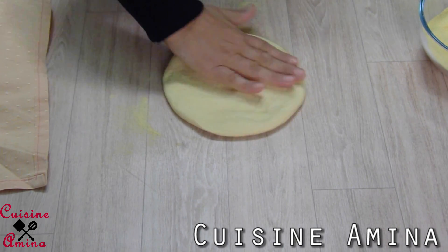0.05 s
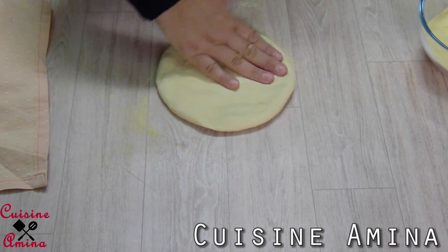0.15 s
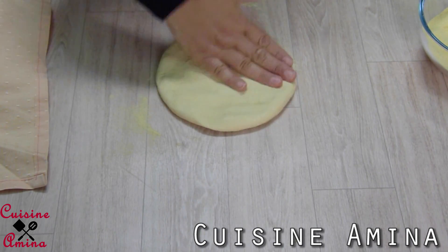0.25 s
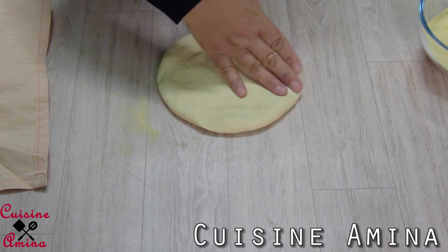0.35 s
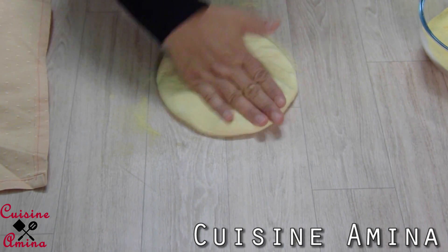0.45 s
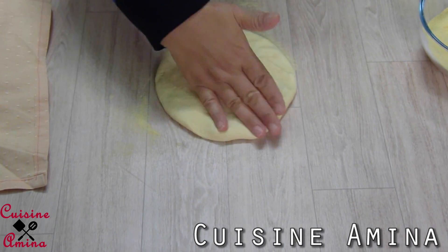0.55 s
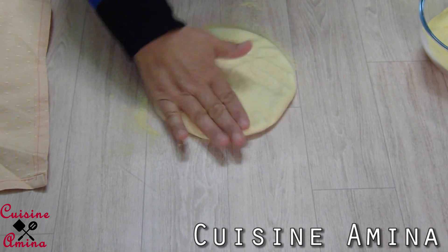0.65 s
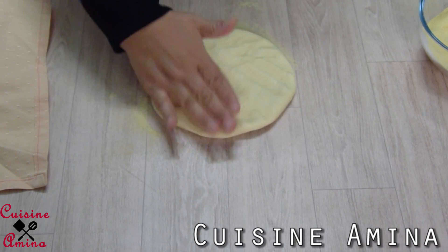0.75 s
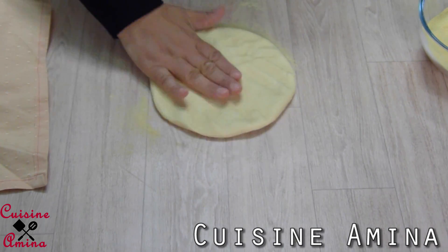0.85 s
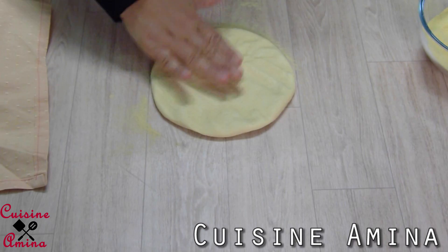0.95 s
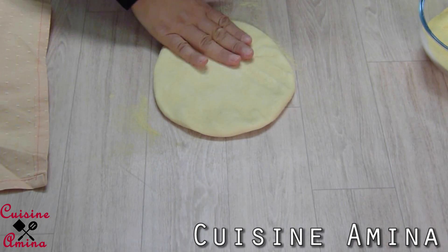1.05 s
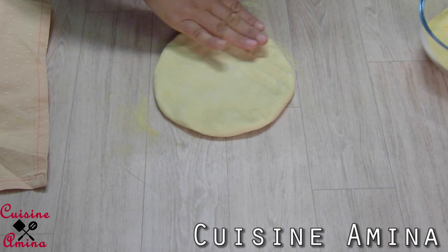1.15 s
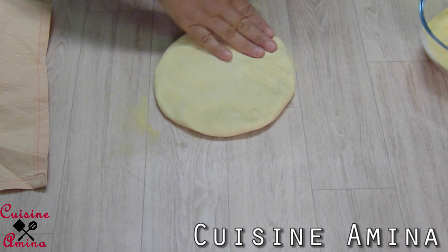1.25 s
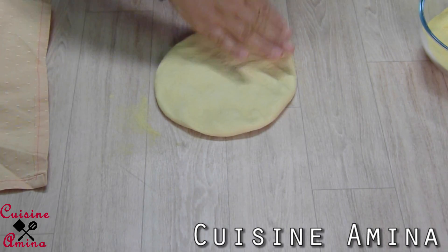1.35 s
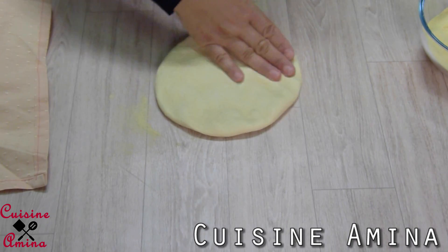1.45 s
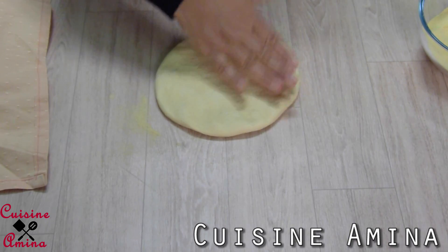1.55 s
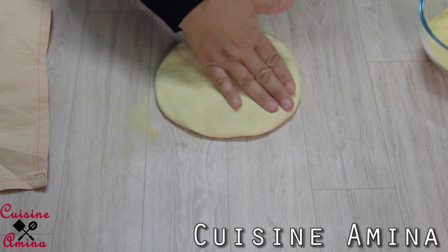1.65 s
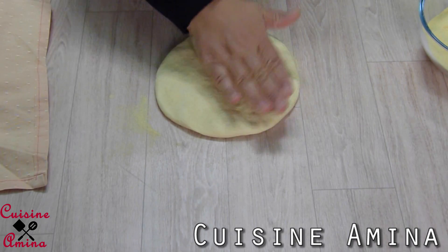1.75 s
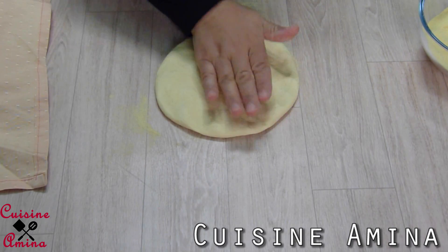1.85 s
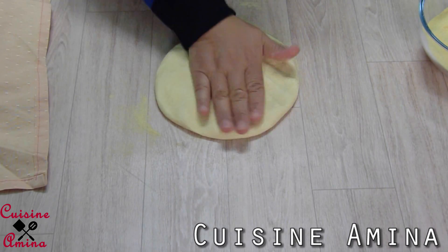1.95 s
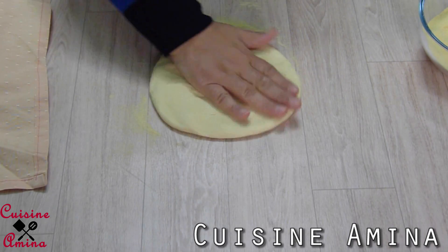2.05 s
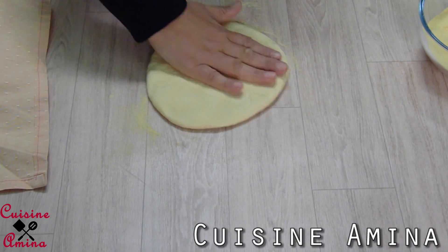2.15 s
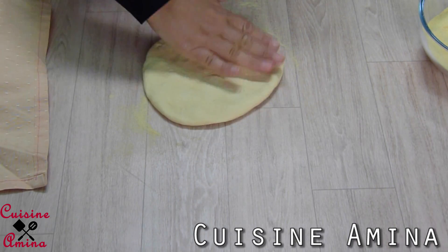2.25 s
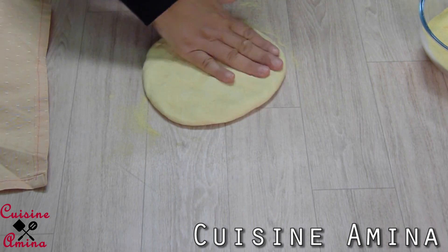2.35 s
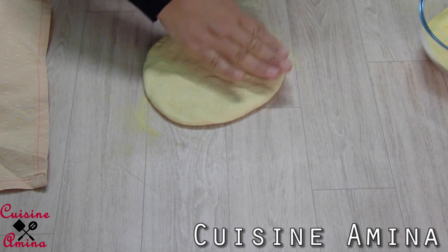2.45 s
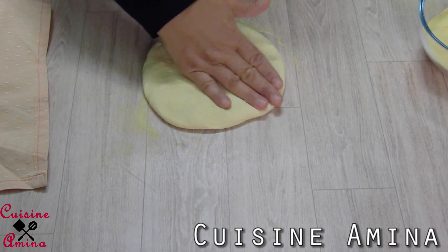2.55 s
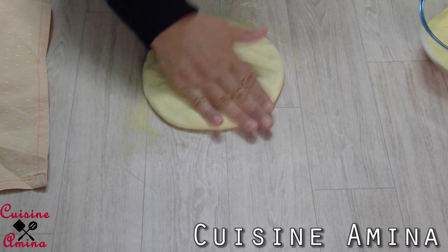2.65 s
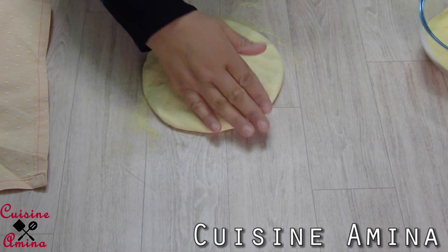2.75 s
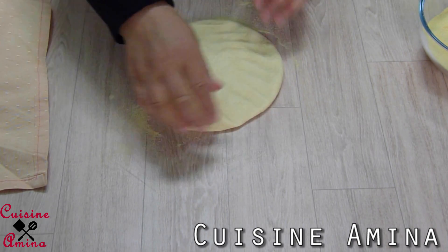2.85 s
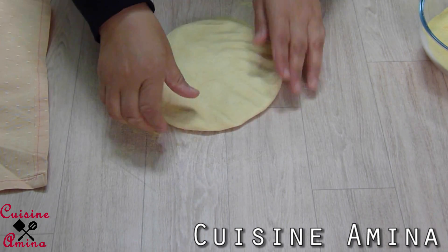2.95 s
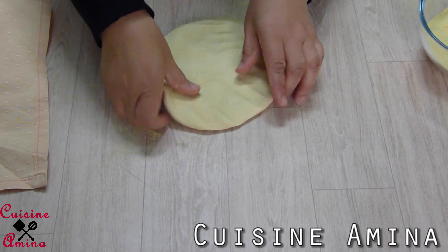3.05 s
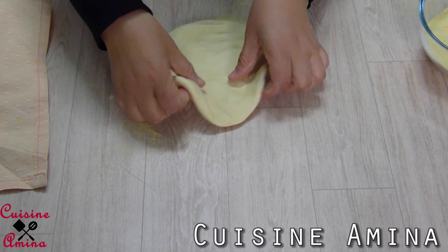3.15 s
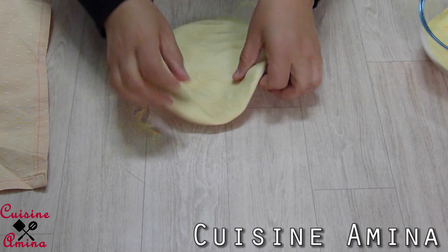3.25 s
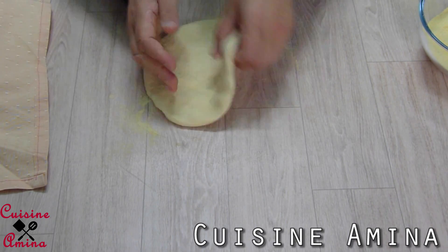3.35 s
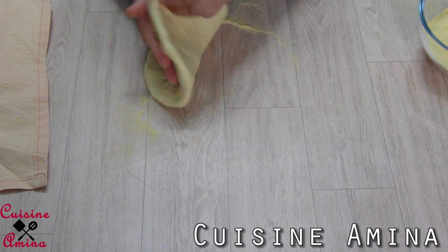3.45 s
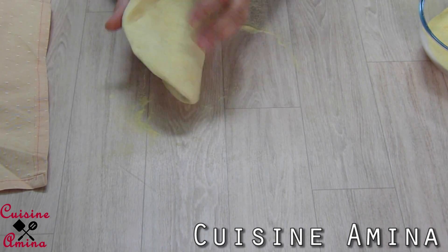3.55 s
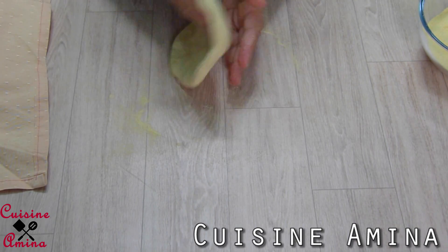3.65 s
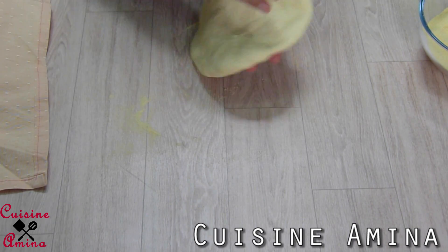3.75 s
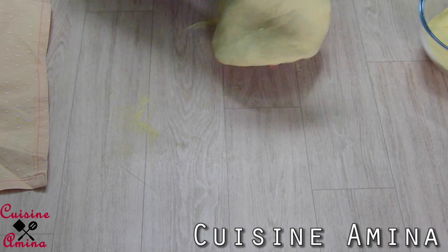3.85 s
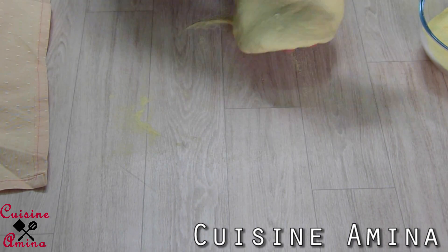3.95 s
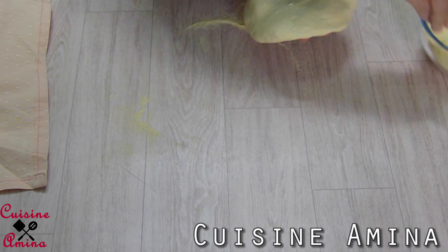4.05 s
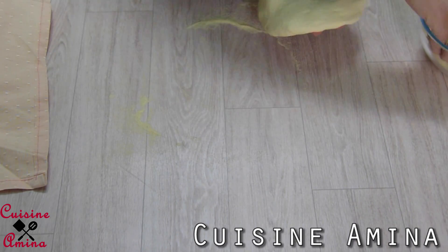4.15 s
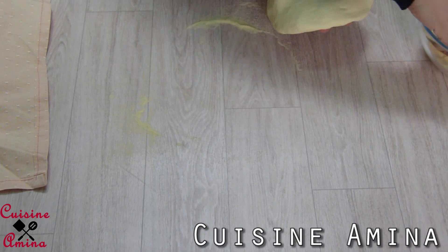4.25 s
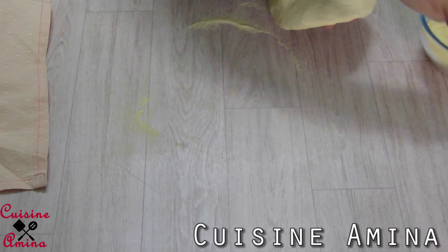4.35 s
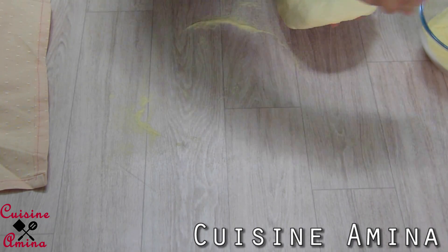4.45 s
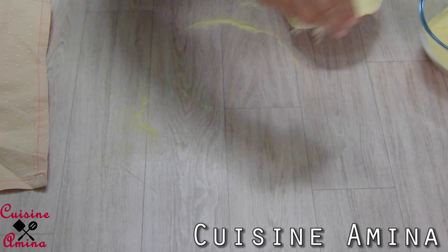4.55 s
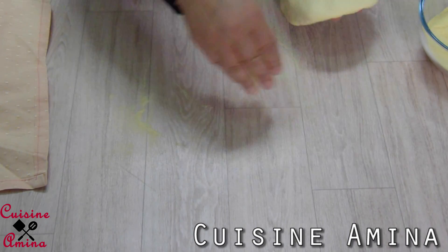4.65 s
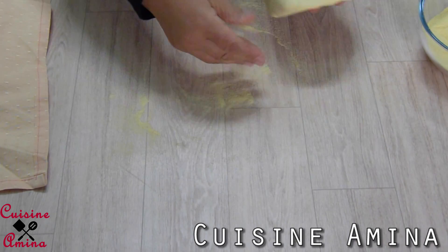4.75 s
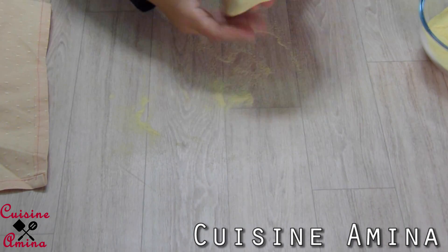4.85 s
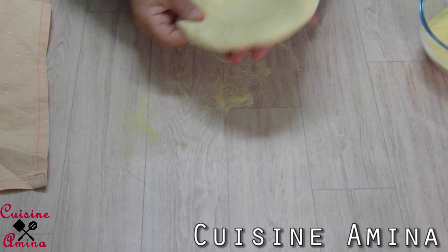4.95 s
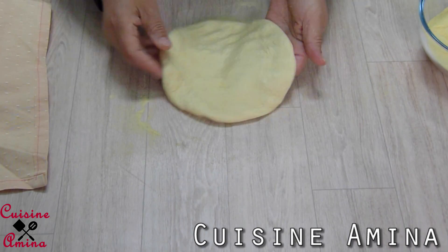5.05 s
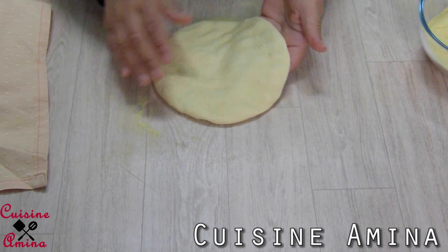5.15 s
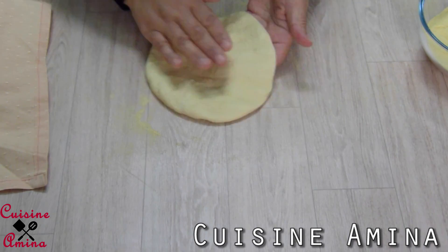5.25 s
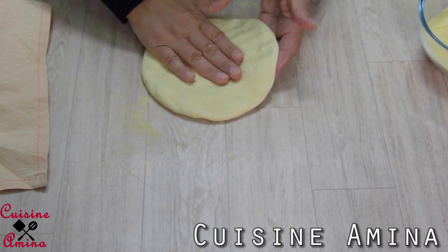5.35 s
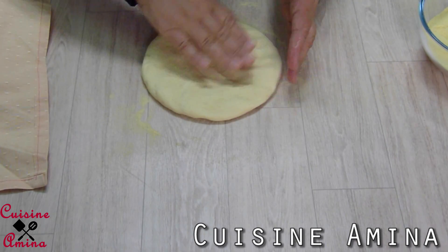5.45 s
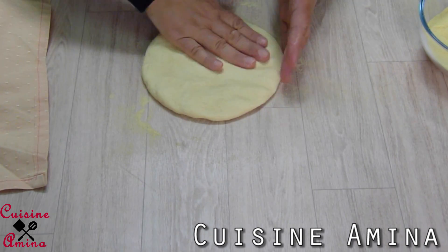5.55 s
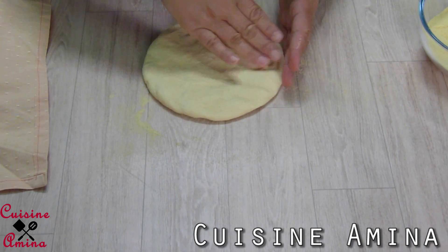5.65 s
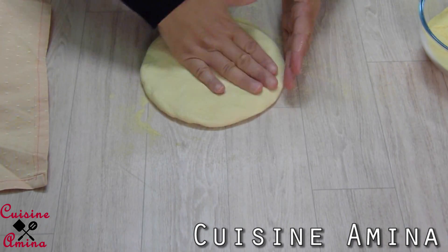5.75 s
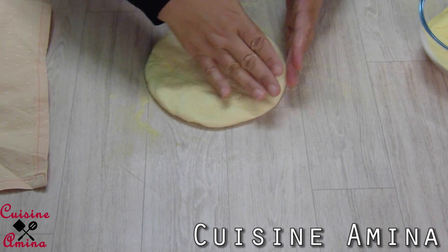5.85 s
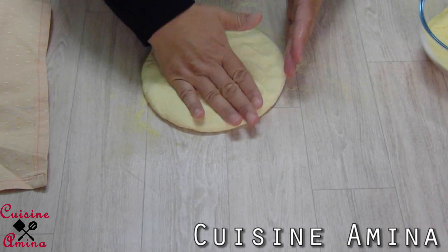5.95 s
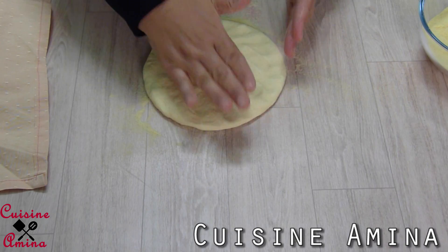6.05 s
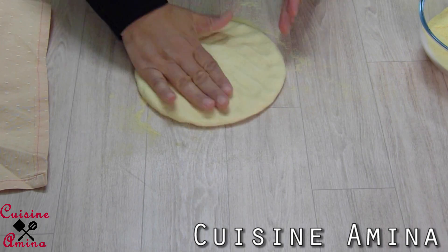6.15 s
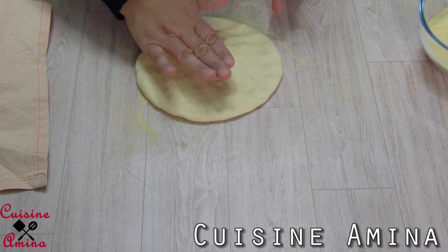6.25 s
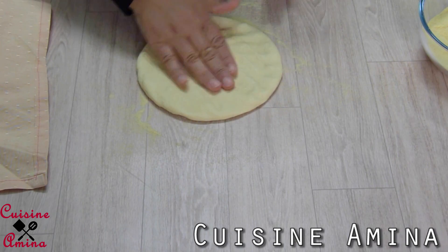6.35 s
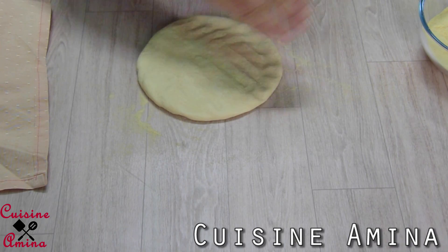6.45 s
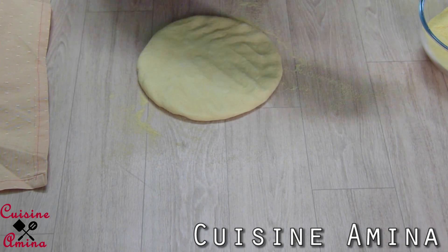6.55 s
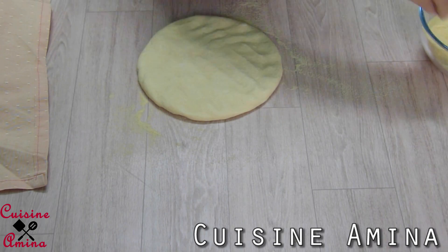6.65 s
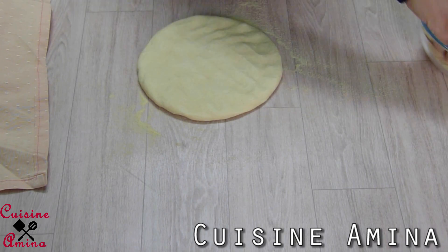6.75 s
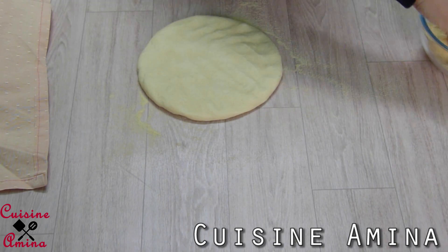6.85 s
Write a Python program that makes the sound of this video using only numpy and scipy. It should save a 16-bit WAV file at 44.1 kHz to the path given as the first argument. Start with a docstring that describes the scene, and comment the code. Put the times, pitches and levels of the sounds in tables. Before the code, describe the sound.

A hand pats soft dough flat on a floured table, about five times a second. Light pats grow into hard slaps that make the tabletop boom, then ease off. The dough is turned over with small ticks and a gritty slide, and a glass bowl rings faintly once. The patting resumes, with two hard slaps near the end. Heard up close in a small, slightly echoing kitchen with a steady low rush.

```python
"""Over the steady low rush of a small, hard-walled kitchen, a hand pats soft dough flat on a floured table.
Light pats grow into hard ones: each push drives the table top into a low boom as air claps under the palm.
The patting eases and the dough is turned over, ticking and sliding on gritty flour; at about 4 s a
glass bowl is touched once and rings. The pats resume, two hard ones come just after 6 s, and they die away.
Throughout, the walls answer with a short reverberation."""
import sys
import numpy as np
from scipy import signal
from scipy.fft import rfft, irfft, next_fast_len
from scipy.io import wavfile

SR = 44100
rng = np.random.default_rng(int(sys.argv[2]) if len(sys.argv) > 2 else 0)


def wav_record(signal):
    """Record a signal, one row per channel, as 16-bit PCM in the file named by sys.argv[1]."""
    frames = np.transpose(np.atleast_2d(signal))
    bounded = np.clip(frames, -1, 1)
    # unit amplitude maps onto the largest positive 16-bit level
    quanta = np.round(bounded * 32767).astype(np.int16)
    wavfile.write(sys.argv[1], SR, quanta)


N = 304731

# pats of the hand: start_s, thump_db, contact_ms, knock_db, knock_hz, slap_db
PATS = [(0.002, 1.5, 0.56, -16.5, 525, -17), (0.136, 0, 1, -22, 520, -27), (0.318, 0.5, 1, -20, 510, -25),
        (0.5208, 2, 0.61, -13, 584, -19), (0.722, 30.5, 3.8, -11, 540, -13),
        (0.913, 20.5, 0.25, 3, 595, -3), (1.079, 20.5, 0.37, -7.5, 382, -1.1),
        (1.2505, 21, 2, -15.5, 520, -14.5), (1.452, 16, 1.22, -11, 566, -13),
        (1.6485, 21, 1.58, -11.5, 540, -13.5), (1.86, 7.5, 1.35, -22, 530, -20),
        (2.001, -0.5, 1.2, -18.5, 537, -21), (2.0151, 8.5, 0.35, -25, 380, -37),
        (2.3705, 14.5, 0.42, -5, 400, -4.5), (2.56, 14.5, 0.81, -12, 563, -13.5),
        (2.7338, 20, 3.6, -22, 520, -24), (2.791, -4, 0.18, -16, 610, -20.5),
        (3.0634, 7.5, 1.9, -18, 534, -34), (3.195, 1.5, 0.27, -10, 494, -28),
        (3.322, -5.5, 0.17, -19, 510, -15), (4.1289, 6, 1.03, -28, 520, -29.5),
        (4.8751, -8, 0.16, -25, 517, -23.5), (5.079, -1, 0.28, -21, 520, -16),
        (5.1074, 5, 0.16, -8.5, 554, -7), (5.1284, 9, 0.28, -23, 520, -6), (5.398, 5.5, 1.7, -17, 534, -15),
        (5.545, -0.5, 0.13, -11, 870, -40), (5.585, 9.5, 0.35, -4, 585, -6.5),
        (5.7864, 4.5, 0.5, -15, 700, -19), (5.992, -4, 0.36, -20.5, 535, -18.5),
        (6.2085, 21, 0.5, -2, 720, -3.5), (6.369, 21.5, 0.55, -6.5, 710, -1),
        (6.5294, -1.5, 1.1, -40, 520, -41), (6.897, -14, 0.55, -17, 525, -28)]


def amp(db):
    """Decibels to amplitude ratio."""
    return 10 ** (np.asarray(db) / 20)


def unit(x):
    """Normalisation to rms 1."""
    return x / np.sqrt(np.mean(x ** 2) + 1e-20)


def along(points, hz):
    """Interpolation of (frequency, value) points on a logarithmic frequency axis."""
    f, v = np.transpose(points)
    return np.interp(np.log(hz + 1), np.log(f + 1), v)


def filtered(x, response):
    """Linear filtering: the spectrum of x times a frequency response."""
    n = x.shape[-1]
    m = next_fast_len(n + min(n, SR))
    return irfft(rfft(x, m) * response(np.fft.rfftfreq(m, 1 / SR)), m)[..., :n]


def resonance(f, hz, width):
    """Frequency response of a damped harmonic oscillator."""
    return 1j * f * width / (hz * hz - f * f + 1j * f * width)


def plate(f, modes):
    """Modal superposition in a plate, whose neighbouring modes swing in opposite directions."""
    return sum((-1) ** k * amp(db) * resonance(f, hz, width) for k, (hz, width, db) in enumerate(modes))


def add(track, s, sound):
    """Superposition of a sound on a track at s seconds."""
    i = max(round(s * SR), 0)
    part = track[..., i:i + sound.shape[-1]]
    part += sound[..., :part.shape[-1]]


def burst(t60, response):
    """Transient excitation: decaying noise through a frequency response, scaled to energy 1."""
    t = np.arange(SR // 16) / SR
    spectrum = rfft(rng.standard_normal(len(t)) * amp(-60 * t / t60), 2 * len(t))
    spectrum = spectrum / np.abs(spectrum) ** .85  # partly evens out random peaks
    puff = irfft(spectrum * response(np.fft.rfftfreq(2 * len(t), 1 / SR)))[:len(t)]
    return puff / np.linalg.norm(puff)


def spread(pair, width):
    """Spatial coherence: mid and side become left and right, alike in the bass at close microphones."""
    # frequency_hz, side_gain
    apart = [(100, .02), (250, 0.04), (500, 0.2), (1000, 0.44), (2000, 0.97), (5000, 1.0), (9000, 0.61)]
    side = filtered(pair[1], lambda f: width * along(apart, f))
    return np.array([pair[0] + side, pair[0] - side])


def room_rush(level_db=-50.5):
    """Stationary noise: the room's steady background, strongest in the bass."""
    # spectrum of the rush: frequency_hz, level_db
    spectrum = [(20, -38), (32, -27), (48, 0), (85, -10.5), (135, 1), (220, -1), (360, 0.5), (550, -7),
                (800, -9.5), (1200, -10), (2000, -18), (4000, -23), (7000, -27), (11000, -37.5)]
    pair = filtered(rng.standard_normal((2, N)), lambda f: amp(along(spectrum, f)))
    return amp(level_db) * spread(unit(pair), width=1.0)


def kitchen_reverb(x, delay_s=.007, block=13230):
    """Reverberation: diffuse reflections follow a short gap, their pattern varying as the hands move."""
    # reverberation time of the kitchen: frequency_hz, t60_s
    decay = [(100, 1), (250, 0.66), (700, 0.53), (2500, 0.47), (6000, 0.47), (10000, 0.39)]
    out = np.zeros((2, N))
    for i in range(0, N, block):  # a fresh random tail for each block
        hz, t, noise = signal.stft(rng.standard_normal((2, SR // 2)), SR, nperseg=256)
        fade = amp(-60 * t / along(decay, hz)[:, None])
        tail = signal.istft(noise * fade, SR, nperseg=256)[1]
        tail /= np.linalg.norm(tail[0])
        add(out, i / SR + delay_s, signal.fftconvolve(x[None, i:i + block], tail, axes=1))
    return spread(out, width=0.68)


def glass_bowl(start_s=4.128, attack_s=0.0022):
    """Free vibration: brushed by a passing hand, the bowl rings in exponentially decaying modes."""
    # modes of the glass: pitch_hz, level_db, t60_s
    modes = [(940, -75, 2.5), (1160, -59.5, 2.8), (4160, -52, 0.33), (6370, -60, 0.32), (9615, -66, .28)]
    out, t = np.zeros(N), np.arange(2 * SR) / SR
    ring = sum(amp(db - 60 * t / t60) * np.sin(2 * np.pi * hz * t) for hz, db, t60 in modes)
    add(out, start_s, ring * (1 - np.exp(-t / attack_s)))
    return out


def skin_squeaks():
    """Friction: skin drags briefly on dough, giving narrow-band noise around one pitch."""
    # squeaks: start_s, level_db, pitch_hz, length_s
    squeaks = [(2.131, -51, 1280, 0.039), (3.208, -45.5, 1190, 0.034), (5.157, -40.5, 2380, 0.041)]
    out = np.zeros(N)
    for s, db, hz, length in squeaks:
        swell = np.hanning(int(length * SR))
        rub = filtered(rng.standard_normal(len(swell)), lambda f: resonance(f, hz, hz / 5) ** 2)
        add(out, s, amp(db) * swell * unit(rub))
    return out


def finger_ticks(t60=0.0081, level_db=-1, widen=1.74):
    """Impulsive excitation: fingertips tap and sticky dough lets go, each tick in its own band."""
    # ticks: start_s, relative_db, centre_hz, base_width_hz
    ticks = [(1.2482, -21, 4500, 1800), (2.6632, -16, 2400, 1000), (2.667, -13.5, 645, 300),
             (2.789, -18, 2010, 900), (3.0442, -18, 4120, 3000), (3.1092, -17, 3120, 1100),
             (3.1354, -21, 5500, 2000), (3.1936, -19, 3000, 1700), (3.3206, -14, 2630, 1100),
             (3.7723, -11, 1030, 320), (3.776, -27, 2600, 1200), (4.3447, -27.5, 3830, 1000),
             (4.4054, -33, 3840, 1000), (4.7627, -30, 4000, 2500), (4.8735, -21.5, 2620, 2200),
             (5.5415, -18.5, 1100, 950), (5.583, -14.5, 2300, 2600), (6.895, -25.5, 2190, 500)]
    out = np.zeros(N)
    for s, db, hz, width in ticks:
        add(out, s, amp(db + level_db) * burst(t60, lambda f: resonance(f, hz, widen * width) ** 2))
    return out


def flour_slide(level_db=-2.0, grains_per_s=4000, hiss_db=-44, hiss_growth=2.5, brisk_db=-41.5):
    """Sliding friction: flour grains roll and catch under the dough; fast strokes add a bright hiss."""
    # strokes of hand and dough: start_s, speeding_up_s, slowing_down_s, full_speed_db
    strokes = [(-0.08, 0.12, 0.25, -42.2), (0.31, 0.084, 0.097, -53.5), (0.515, 0.016, 0.086, -47.5),
               (1.09, .02, .1, -47), (1.17, 0.15, 0.25, -57), (2.05, 0.039, 0.24, -42.5),
               (2.58, .12, 0.28, -56), (3.02, 0.13, 0.21, -46.5), (3.31, 0.032, 0.16, -51),
               (3.44, 0.14, 0.25, -48), (3.76, 0.019, 0.071, -48.5), (4.2, 0.82, .3, -59.5),
               (5.07, 0.032, 0.28, -47.5), (5.19, 0.26, 0.14, -44), (5.77, 0.028, .18, -48.5),
               (5.97, 0.021, 0.077, -46), (6.84, 0.011, 0.13, -54.5)]
    # spectrum of rubbed flour: frequency_hz, level_db
    flour = [(55, -2), (100, 3.5), (180, 9.5), (300, 2.5), (700, 0), (1500, -3.5), (3000, -2), (5300, 0),
             (7000, -5.5), (11000, -11.5)]
    t = np.arange(N) / SR
    strength = sum(amp(db) * np.interp(t - s, [0, rise, rise + fall], [0, 1, 0])
                   for s, rise, fall, db in strokes)
    catches = (rng.random(N) < grains_per_s / SR) * rng.standard_normal(N)
    friction = unit(catches) + rng.standard_normal(N)
    grit = unit(filtered(friction, lambda f: amp(along(flour, f))))
    hiss = unit(filtered(rng.standard_normal(N), lambda f: resonance(f, hz=6200, width=3500) ** 2))
    hiss_gain = amp(hiss_db) * (strength / amp(brisk_db)) ** hiss_growth
    return amp(level_db) * strength * grit + hiss_gain * hiss


def palm_response(f, s):
    """Cavity resonance: air trapped under a cupped palm colours the slap of some pats."""
    # spectrum of a bare skin slap: frequency_hz, level_db
    slap = [(300, -39), (800, 6), (1500, 2.5), (2500, 1), (4000, -1.5), (5400, -2), (7000, -5.5),
            (11000, -14.5)]
    # trapped air pockets: start_s, over_slap_db, pitch_hz, width_hz
    pockets = [(0.913, 3, 2290, 400), (1.079, -3, 2270, 400), (2.37, 1, 2510, 700),
               (5.585, -0.5, 2490, 450), (6.209, 10, 2800, 550), (6.369, 13.5, 2136, 190)]
    # modes of a pocket: frequency_ratio, level_db
    overtones = [(1.001, 0.5), (1.58, -10), (2.359, -16.5)]
    ring = sum(amp(db + level) * resonance(f, ratio * hz, ratio * width)
               for start, db, hz, width in pockets if abs(start - s) < 0.05
               for ratio, level in overtones)
    return amp(along(slap, f)) * (1 + ring)


def hand_claps(graze_lead_s=0.0066, slap_lead_s=.0021, knock_lead_s=0.001212):
    """Impact noise: before each full push a finger grazes, the palm slaps and the table is knocked."""
    # modes of the dull knock through the dough: pitch_hz, width_hz, level_db
    knock_modes = [(337, 76, 3), (444, 74, 1), (590, 46, -1.5), (650, 58, -0.5), (790, 136, -5),
                   (874, 72, -4), (1204, 480, -7)]
    out = np.zeros(N)
    for s, _, _, knock_db, knock_hz, slap_db in PATS:
        skin = lambda f: palm_response(f, s)
        # a gentle hand settles finger by finger, so its slap is drawn out
        slap_t60 = min(0.0073 * np.exp(-0.2 * slap_db), .08)
        add(out, s - slap_lead_s, amp(slap_db - 1) * burst(slap_t60, skin))
        add(out, s - graze_lead_s, amp(slap_db - 16) * burst(t60=0.067, response=skin))
        # the cup of the hand picks which of the knock's modes speak
        cupped = lambda f: plate(f, knock_modes) * resonance(f, knock_hz, width=220)
        add(out, s - knock_lead_s, amp(knock_db - 1.5) * burst(t60=0.0075, response=cupped))
    return out


def table_boom(gain_db=26):
    """Forced vibration: soft dough spreads each push in time; longer contact gives a duller boom."""
    # modes of the table top: pitch_hz, width_hz, level_db
    modes = [(61.5, 4, -24.5), (115, 22.7, -10.5), (130, 34, -5), (137.8, 13, -12.5), (149.6, 5, -9),
             (194.6, 6.5, -8), (205.9, 5.5, -12), (214.5, 3.1, -6.5), (216.55, 8, -3.5),
             (250.5, 17.4, -7.5), (273.4, 12.6, -8.5), (307.5, 4.1, -15.5), (342, 4.9, -15),
             (368.1, 17.3, -13), (380.6, 32, -17)]
    force, t = np.zeros(N), np.arange(-SR // 50, SR // 50) / SR
    for s, db, contact_ms, *_ in PATS:
        push = np.exp(-np.abs(t) * 1000 / contact_ms)
        add(force, s + t[0], amp(db) * push / push.sum())
    return amp(gain_db) * filtered(force, lambda f: plate(f, modes))


def scene(hands_wet_db=1, boom_wet_db=-15):
    """Direct and reverberant fields: hand sounds fill the room, the boom arrives mostly directly."""
    boom = table_boom()
    hands = hand_claps() + finger_ticks() + skin_squeaks() + flour_slide() + glass_bowl()
    reflections = kitchen_reverb(amp(hands_wet_db) * hands + amp(boom_wet_db) * boom)
    return boom + hands + reflections + room_rush()


def record(dry, low_hz=45.0, top_hz=11100):
    """Band limiting: deep bass is cut; treble falls to a notch at 8 kHz, with a faint band to 11 kHz."""
    # treble roll-off and notch: frequency_hz, gain_db
    treble = [(6000, 0.5), (7000, -2), (7600, -10), (8050, -30), (8450, -10.5), (9100, -7.5),
              (10000, -12.5), (11000, -35.5)]
    high_pass = lambda f: f ** 4 / np.sqrt(f ** 8 + low_hz ** 8)
    return filtered(dry, lambda f: amp(along(treble, f)) * high_pass(f) * (f < top_hz))


dry = scene()
out = record(dry)
wav_record(out)
```